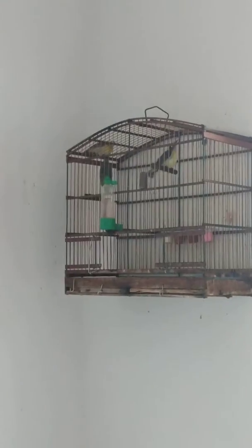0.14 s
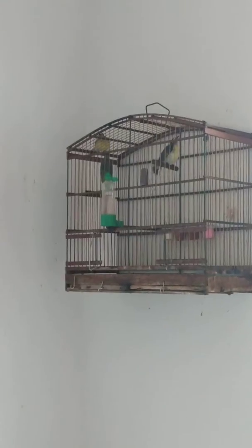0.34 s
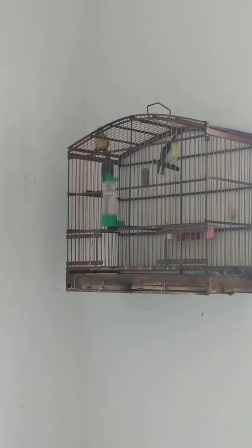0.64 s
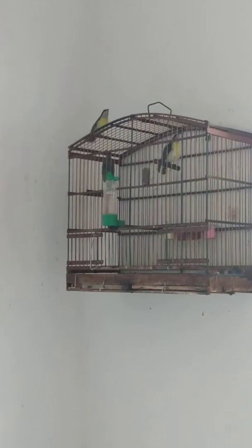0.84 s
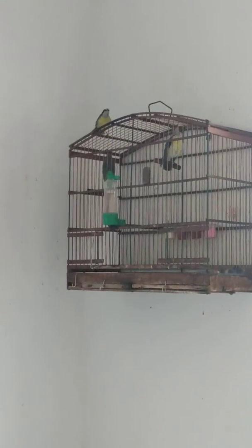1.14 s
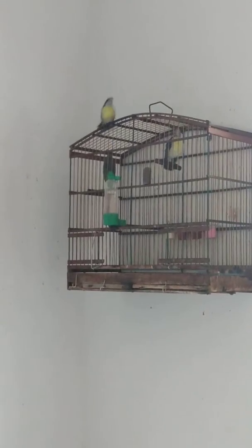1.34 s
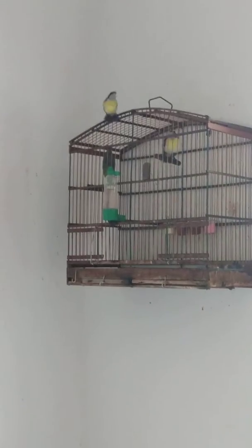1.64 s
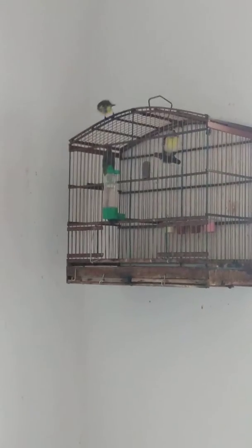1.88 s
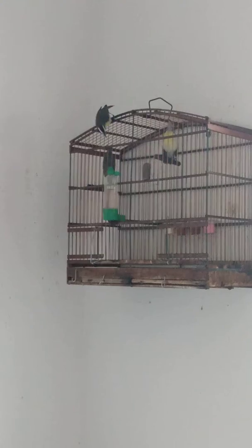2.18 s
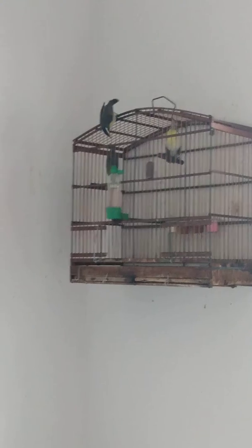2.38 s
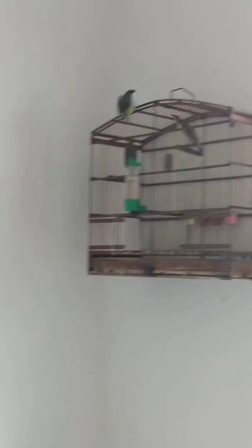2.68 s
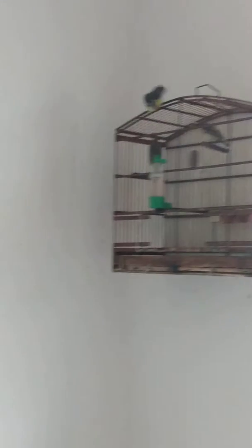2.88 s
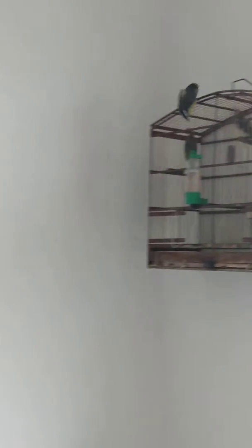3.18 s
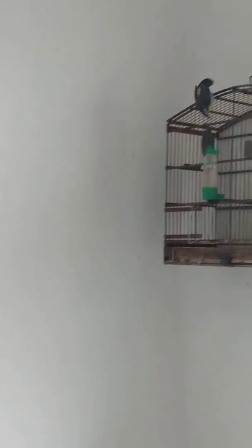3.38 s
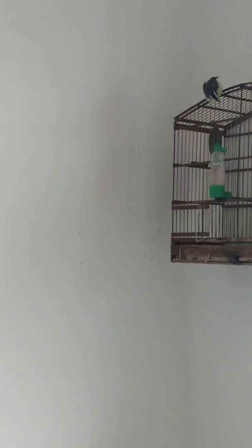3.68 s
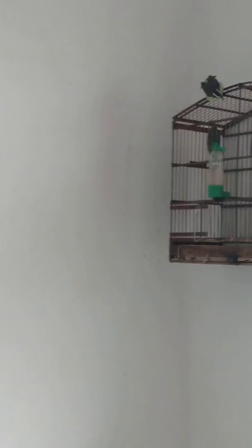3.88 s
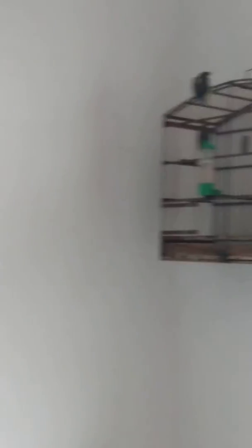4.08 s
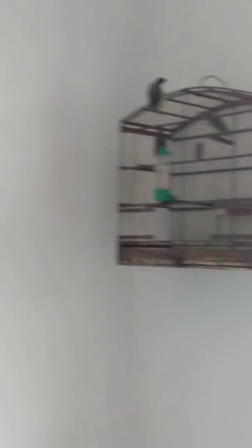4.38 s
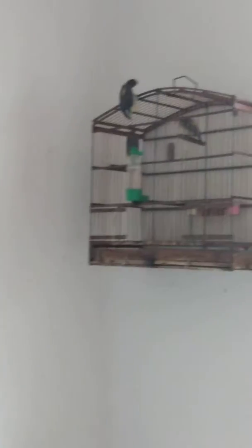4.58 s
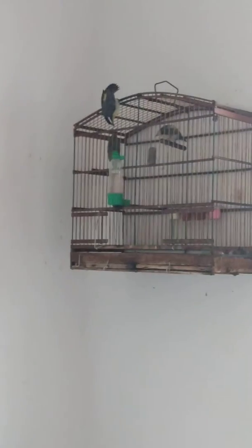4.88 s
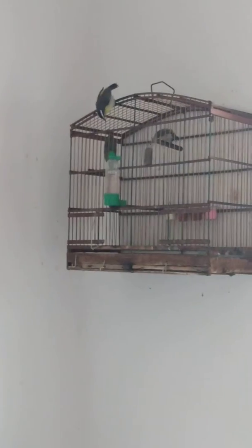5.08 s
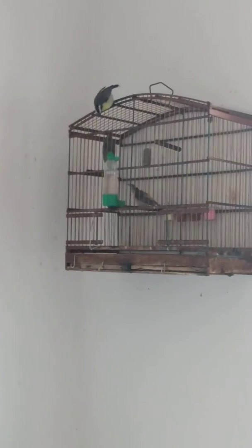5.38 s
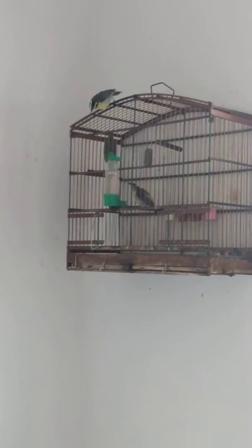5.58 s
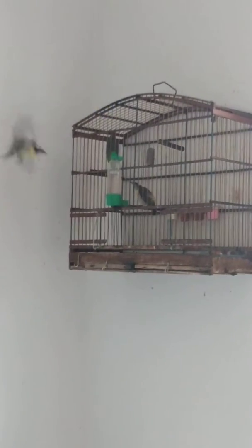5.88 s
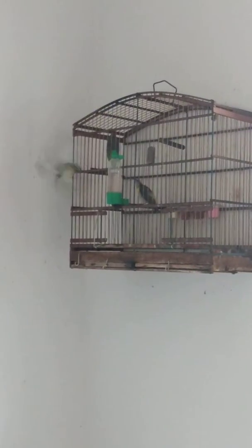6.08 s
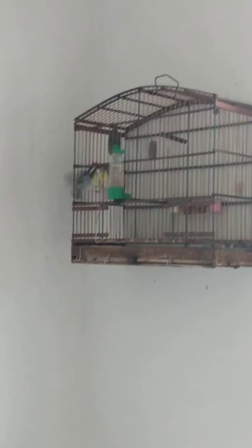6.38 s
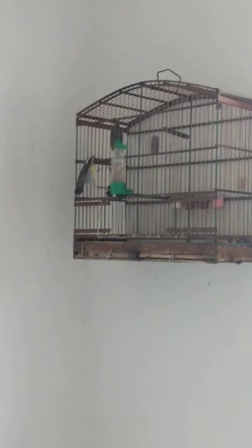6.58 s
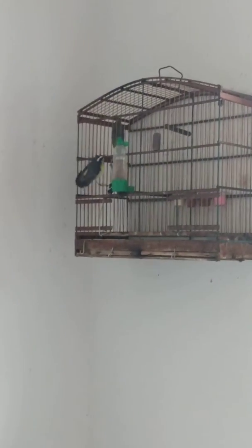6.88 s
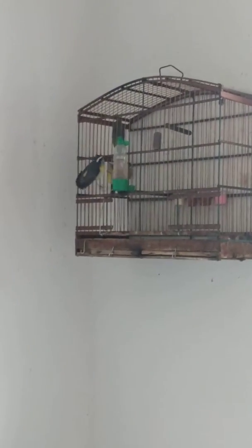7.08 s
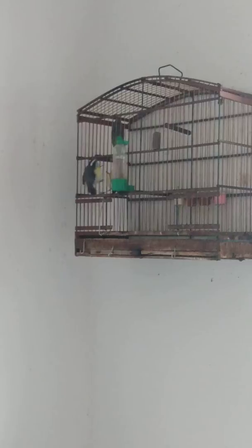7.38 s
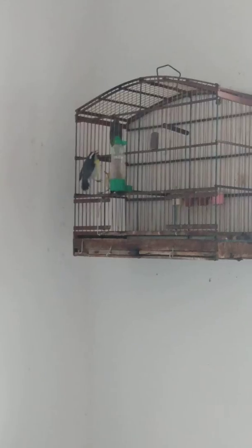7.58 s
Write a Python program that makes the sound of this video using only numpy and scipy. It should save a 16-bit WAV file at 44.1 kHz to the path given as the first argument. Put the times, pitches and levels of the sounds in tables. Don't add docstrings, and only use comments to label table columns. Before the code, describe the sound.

Two small caged songbirds in a bare, echoing room: one sings gliding whistles and raspy buzzes, the other gives sharp high chips, with claw ticks and wing flutters.

```python
import sys
import numpy as np
from scipy import signal
from scipy.fft import rfft, irfft
from scipy.io import wavfile
from scipy.ndimage import uniform_filter1d, minimum_filter1d

SR = 44100
rng = np.random.default_rng(int(sys.argv[2]) if len(sys.argv) > 2 else 0)


def invert_db(level):
    return 10 ** (np.asarray(level, dtype=float) / 20)


def transcribe(signal):
    frames = np.atleast_2d(signal).T
    limited = np.clip(frames, -1, 1)
    pcm = np.round(limited * 32767).astype(np.int16)
    wavfile.write(sys.argv[1], SR, pcm)


N = 341334
LEAD = SR // 4

# (time [s], left minus right [dB])
FACING = [(0.05, 1.5), (2.5, 0.5), (2.89, 1), (3.021, -4), (3.859, 4), (4.33, 1), (4.66, -0.5), (5.6, 0),
          (6.7, 3.5), (7.241, -1.5), (7.74, 2)]
# (start [s], length [s], low pitch [Hz], top pitch [Hz], peak level [dB])
WHISTLES = [
    (-.21, 0.285, 1904, 4824, -25),
    (2.958, 0.3, 1750, 4920, -27),
    (5.149, 0.13, 2410, 5057, -28),
    (5.383, 0.082, 2500, 5064, -31.5),
    (7.138, 0.3, 1900, 4835, -28),
]
WHISTLE_BEND, SWELL_DB, SWELL_BEND, SLOPE_DB = 2.2, -24.5, 3.47, -8.5
# (start [s], top pitch [Hz], level [dB], change towards the top [dB])
FLICKS = [
    (0.076, 9810, -30.5, 0),
    (5.281, 9740, -30.5, 1.5),
    (5.464, 9710, -31, 3),
]
FLICK_S, FLICK_HZ, FLICK_BEND, FLICK_SWING_HZ, FLICK_SOFT_DB = 0.036, 5000, 0.82, 350, -15.5
# (start [s], length [s], first pitch [Hz], last pitch [Hz], level [dB])
UNDERTONES = [
    (2.792, 0.15, 3130, 2166, -53),
    (6.956, 0.19, 3135, 2320, -52.5),
]
UNDERTONE_SWING_HZ, UNDERTONE_DIP_DB = 200, -8.5
# (time from start [s], pitch [Hz], effort [dB], buzz swing [Hz])
OPENING = [(0, 6470, -16, 200), (.012, 7970, -14.5, 150), (.028, 7880, 2, 292), (.038, 5000, -13, 394),
           (.05, 7700, -1.5, 1150), (.09, 7100, -1.5, 1800), (.14, 6250, -14.5, 2480),
           (.21, 5490, -18.5, 2710)]
CHURR = [(0, 8300, -8.5, 296), (.014, 7315, -1, 690), (.025, 4300, -7.5, 400), (.036, 6900, -5, 1200),
         (.075, 6317, -5.5, 1660), (.12, 5690, -7.5, 1540), (.155, 5274, -2, 874), (.23, 4750, -1.5, 850),
         (.295, 3800, -7.5, 505)]
RASP = [(0, 2918, -7.5, 913), (.075, 4470, 2, 868)]
CLIMB = [(0, 4700, -25.5, 67), (.055, 5427, -8.5, 190), (.11, 6004, -6, 680), (.16, 6567, -3, 910),
         (.21, 6986, -0.5, 250), (.25, 7480, -1, 80), (.3, 7805, 1, 4.9), (.35, 7930, -0.5, 7.6)]
STUTTER = [(0, 8000, -14, 60), (.018, 7790, 1, 100), (.028, 4273, -17, 290), (.04, 7300, -5.5, 1510),
           (.07, 7800, -16, 1800), (.11, 7340, -11, 1480)]
TSIP = [(0, 8000, -16, 8), (.015, 7995, -3.5, 24), (.034, 5400, -18, 240), (.042, 7790, -5, 1180),
        (.075, 7680, -16, 1800), (.11, 7220, -24, 2360)]
DRAWL = [(0, 7600, -11, 398), (.02, 7926, -1, 850), (.06, 7450, -7.5, 1240), (.1, 6910, -7.5, 1690),
         (.14, 6500, -17, 1700), (.18, 6284, -18, 1510), (.195, 6930, -4.5, 1200), (.23, 7180, -3.5, 710)]
PLUNGE = [(0, 7360, -2, 210), (.028, 5580, -0.5, 33), (.058, 4425, -3, 25), (.095, 3934, -10, 14),
          (.14, 3696, -8.5, 60), (.158, 3600, -14, 60), (.175, 2900, -11.5, 150), (.195, 2680, -39, 150)]
STAIR = [(0, 2400, -34, 180), (.04, 2964, -26.5, 73), (.066, 3400, -12.5, 40), (.078, 3604, -8.5, 47),
         (.13, 3927, -11.5, 210), (.175, 4260, -7.5, 10), (.24, 4649, -2.5, 12), (.305, 4814, -3.5, 6.1)]
HOOK = [(0, 5000, -7, 60.4), (.012, 6680, -4.5, 150), (.022, 7390, 1, 150), (.04, 7600, -6, 301)]
# (shape, start [s], level [dB], pace [factor], pitch [factor])
VERSES = [(OPENING, 2.416, -46, 1.01, 0.99), (CHURR, 2.6806, -38, 1.01, 0.95),
          (RASP, 3.345, -46, 1.01, 1.03), (RASP, 7.535, -48, 0.95, 0.98), (CLIMB, 3.39, -28.5, 1.01, 1.001),
          (STUTTER, 3.862, -32, 1.2, 1.008), (TSIP, 4.003, -22.5, 1.001, 1.007),
          (DRAWL, 4.162, -26, 0.93, 0.94), (PLUNGE, 4.393, -26, 1.02, 1.001),
          (TSIP, 4.62, -26.5, 0.89, 1.001), (STAIR, 4.745, -23.5, 1.001, 1.001),
          (OPENING, 6.624, -44, .85, 1), (CHURR, 6.843, -36.5, 0.98, 1.037),
          (HOOK, 7.449, -37, 1.001, 1.001), (CLIMB, 7.585, -29, 1.001, 1.001)]
RUSH_DB, RUSH_HZ_PER_S = 16.5, 82000
TURN_DIP_DB = -10
# (start [s], length [s], first pitch [Hz], last pitch [Hz], level [dB])
OVERPEEPS = [
    (2.432, .03, 9510, 9330, -48.5),
    (3.853, 0.038, 8970, 9400, -49),
    (4.617, .035, 9660, 9720, -38.5),
    (6.638, 0.028, 9500, 9450, -50),
]
# (start [s], upper voice [dB], its top pitch [Hz], lower voice [dB], its pitch [Hz])
CHIPS = [
    (0.446, -25, 11430, -23, 8150),
    (0.549, -30, 10820, -23.5, 7728),
    (1.443, -29.5, 11140, -27.5, 7723),
    (1.843, -25, 11340, -25.5, 8060),
    (3.205, -20.5, 11040, -24.5, 7820),
    (3.896, -38, 11600, -37, 8380),
    (5.011, -20.5, 10970, -25, 7710),
    (5.918, -24, 11030, -26, 7880),
    (6.334, -31, 10690, -25, 7785),
    (7.291, -23, 11050, -25, 7680),
]
CALLER_PAN_DB = 6.5
# (start [s], length [s], first pitch [Hz], last pitch [Hz], level [dB])
FAR_BIRDS = [
    (0.677, 0.07, 3920, 4090, -56.5),
    (0.559, 0.038, 2440, 2310, -62.5),
    (1.448, 0.038, 2460, 2310, -67.5),
    (1.65, 0.078, 6400, 4040, -67.5),
    (5.77, 0.08, 5500, 5050, -60),
    (6.188, 0.065, 5520, 4950, -62),
    (6.17, 0.14, 3700, 3340, -62),
    (6.42, 0.2, 2930, 2960, -61),
]
# (start [s], length [s], wires [dB], scrape [dB], wires nearest the grip [Hz])
HOPS = [(0.535, 0.039, -46.5, -81, 12500), (0.72, 0.027, -59, -80, 5400), (0.864, 0.077, -45.5, -82, 13350),
        (0.872, 0.044, -49.5, -80, 7000), (0.921, 0.032, -50, -76, 8640), (0.926, 0.057, -59, -88, 4160),
        (1.32, 0.059, -65, -99.5, 6100), (1.398, .04, -59, -99, 5100), (1.399, 0.054, -56, -99, 7900),
        (0.897, 0.042, -58, -90, 5740), (1.395, 0.046, -51.5, -82, 11600), (1.912, 0.15, -91.5, -64, 6060),
        (2.194, .03, -80, -99, 14000), (5.52, 0.11, -65, -61, 9000), (5.763, 0.041, -48.5, -55, 13700),
        (5.855, 0.44, -75, -64, 8950), (6.271, 0.42, -82, -63, 9000)]
# (pitch [Hz], width [Hz], level [dB])
WIRES = [(4120, 220, -8.5), (5090, 110, -5.5), (5855, 170, -0.5), (6740, 110, -6.5), (7620, 200, -3),
         (4520, 130, -15), (6980, 250, -4), (8900, 400, 2.5), (10400, 160, -7), (11600, 400, -6),
         (12500, 120, -3.5), (13900, 130, -7), (15100, 200, -5)]
# (frequency [Hz], density [dB per Hz])
SCRAPE = [(120, -40.5), (200, -14.5), (4040, -11), (4680, -12), (5730, -10.5), (6280, -15.5), (8900, -15),
          (10500, -11), (12400, -23), (16000, -29)]
# (start [s], length [s], level [dB], centre [Hz])
WINGS = [(0.86, 0.22, -54.5, 1020), (3.6, 0.1, -69.5, 1000), (4.503, 0.31, -73, 714),
         (5.134, 0.18, -70, 1500), (5.38, 0.11, -71, 1530), (7.662, 0.089, -66.5, 610),
         (5.529, 0.25, -50, 362), (5.782, 0.22, -58, 470), (5.927, 0.24, -48, 350), (6.057, 0.23, -49, 334),
         (6.236, 0.27, -49.5, 400), (6.535, 0.27, -68, 284)]
WING_RISE_S, WING_FADE_DB, WING_SINK = 0.017, -23.5, 0.85
# (start [s], length [s], pitch [Hz], level [dB])
KNOCKS = [
    (0, 0.076, 510, -74),
    (0.686, 0.085, 740, -78),
    (3.495, 0.12, 506, -60),
    (6.6, 0.15, 540, -71),
    (7.593, 0.11, 516, -60.5),
]
# (time [s], level [dB])
HUM = [(0.0, -76), (1.03, -78), (1.31, -89.5), (1.79, -85.5), (3.34, -77.5), (3.38, -83), (4.4, -75.5),
       (5.5, -87), (5.58, -69), (6.03, -75.5), (6.08, -61), (6.36, -57.5), (7.61, -78.5), (7.74, -90.5)]
# (pitch [Hz], width [Hz], level [dB])
DRONE = [(114.4, 19, -1), (129, 26, -3), (164, 15, -7)]
HUM_DB, DRONE_DB, DRONE_FOLLOWS = 6.5, -66.5, 0.55
# (time [s], level over the drone [dB])
THUMPS = [
    (.34, 4.5),
    (.99, 12),
    (3.62, 5),
    (5.6, 12.5),
    (6.08, 9),
    (7.09, 8.5),
    (7.73, 3),
]
THUMP_S = 0.054
# (frequency [Hz], density [dB per Hz])
FLOOR = [(12, -72), (20, -6.5), (104, -7.5), (262, -35), (472, -15), (642, -26), (1220, -22), (4540, -44),
         (13900, -31.5), (16000, -44)]
FLOOR_DB = -85.5
# (frequency [Hz], time to fall 60 dB [s])
ROOM = [(300, 0.067), (2000, 0.6), (3500, 0.59), (5000, 0.57), (8000, 0.51), (12000, 0.39), (16000, 0.38)]
ECHO_S, ECHO_DB = 0.0145, -6.5
EARLY_GAIN, EARLY_S = 0.59, 0.028
GATE_DB = -108
# (frequency [Hz], gain [dB])
MIC = [(1000, -4), (2500, 8), (5000, 9.5), (8000, 8.5), (10000, 3.5), (12000, 8.5), (14500, 7.5),
       (16000, 9.5)]
EDGE_HZ = 15850
CEILING = 0.74
UNDER_DB, UNDER_SLOPE_DB, CHANCE_DB, LOW_HZ = 49, 0.9, 7.5, 900
NEIGHBOUR_DB = 38
SPARSE_DB, SPARSE_HZ, SPARSE_WIDTH_HZ = 2.5, 3900, 1700


def evened(x):
    return x / np.sqrt(np.mean(x ** 2) + 1e-20)


def read(points, hz):
    f, value = np.transpose(points)
    return np.interp(np.log(hz + 1), np.log(f + 1), value)


def add(mix, s, sound):
    part = mix[..., round(s * SR):][..., :sound.shape[-1]]
    part += sound[..., :part.shape[-1]]


def coloured(x, points):
    n = x.shape[-1]
    return irfft(rfft(x) * invert_db(read(points, np.fft.rfftfreq(n, 1 / SR))), n)


def resonate(x, hz, width):
    turn = np.exp(2j * np.pi * np.cumsum(hz * np.ones(x.shape[-1])) / SR)
    r = np.exp(-np.pi * width / SR)
    return 2 * (turn * signal.lfilter([1 - r], [1, -r], x / turn)).real


def resonate_twice(x, hz, width, second_width):
    return resonate(resonate(x, hz, width), hz, second_width)


def sides(pan_db):
    return invert_db(np.array([pan_db, -pan_db]) / 2)


def partial(hz, order=1):
    wave = np.sin(2 * np.pi * order * np.cumsum(hz) / SR)
    return np.sqrt(2) * wave * (order * hz < SR / 2 - 1000)


def singer():
    voice = np.zeros(N + LEAD)
    for rule, table in (whistle, WHISTLES), (flick, FLICKS), (undertone, UNDERTONES), (syllable, VERSES):
        for row in table:
            rows = rule(*row)
            add(voice, rows[0][0] + LEAD / SR, note(rows))
    return voice * sides(np.interp(np.arange(-LEAD, N) / SR, *np.transpose(FACING)))


def whistle(start, length, low_hz, top_hz, db):
    left = np.linspace(1, 0, num=12)
    hz = top_hz - (top_hz - low_hz) * left ** (WHISTLE_BEND - 1.9 * length)
    level_db = db + SWELL_DB * left ** SWELL_BEND + SLOPE_DB * left
    return np.transpose([start + length * (1 - left), hz, level_db, 0 * left])


def flick(start, top_hz, db, change_db):
    u = np.linspace(0, 1, num=9)
    hz = FLICK_HZ + (top_hz - FLICK_HZ) * u ** FLICK_BEND
    level_db = db + FLICK_SOFT_DB * np.clip(1 - u / 0.52, 0, 1) + change_db * np.clip(u - 0.4, 0, 1) / 0.6
    return np.transpose([start + FLICK_S * u, hz, level_db, FLICK_SWING_HZ * u])


def undertone(start, length, first_hz, last_hz, db):
    u = np.linspace(0, 1, num=3)
    hz = first_hz + (last_hz - first_hz) * u
    level_db = db + UNDERTONE_DIP_DB * np.sin(np.pi * u)
    return np.transpose([start + length * u, hz, level_db, UNDERTONE_SWING_HZ + 0 * u])


def syllable(shape, start, db, pace, pitch):
    return np.array(shape) * [pace, pitch, 1, 1] + [start, 0, db, 0]


def note(rows):
    s, *columns = np.transpose(rows)
    t = np.arange(s[0], s[-1], 1 / SR)
    hz, level_db, swing_hz = (uniform_filter1d(np.interp(t, s, c), 200, mode="nearest") for c in columns)
    wander = evened(uniform_filter1d(rng.standard_normal(len(t)), 150))
    shake = np.sin(2 * np.pi * np.cumsum(330 * (1 + 0.25 * wander)) / SR)
    low_hz, rasp_fall_db = 1500 + 0.15 * hz, 5.74 * hz / 1000
    rush_db = RUSH_DB * np.clip(abs(np.gradient(hz)) * SR / RUSH_HZ_PER_S, 0, 1)
    hz = hz * (1 + 0.0015 * wander) + swing_hz * shake
    harsh_db = 11.14 * swing_hz / 1000
    edge_db = 0.19 * (level_db - level_db.max())

    second_db = -41.0 + 3.5 * hz / 1000 + 0.51 * harsh_db + edge_db
    third_db = -23.5 + 0.33 * harsh_db + 2.2 * edge_db
    tone = partial(hz) + invert_db(second_db) * partial(hz, order=2) + invert_db(third_db) * partial(hz, order=3)
    tone = tone * invert_db(TURN_DIP_DB * (shake ** 2 - 0.3453) * np.clip(swing_hz / 600, 0, 1))

    air = rng.standard_normal((2, len(t)))
    halo = evened(resonate(resonate_twice(air[0], hz, 1800, 1800), hz, 1800))
    throat = resonate(resonate(air[0], 1390, 900), 1500, 1200)
    hiss = np.diff(air[1], prepend=0) + 0.64 * throat
    breath = invert_db(-24 + 1.2 * harsh_db) * halo + invert_db(-29.5 + 0.32 * edge_db + rush_db) * hiss
    rasp_db = -13.5 + 1.51 * harsh_db - rasp_fall_db
    rasp = invert_db(rasp_db) * evened(resonate_twice(air[1], low_hz, 710, 800))
    return invert_db(level_db) * (tone + breath + rasp) * signal.windows.tukey(len(t), min(1, 700 / len(t)))


def caller():
    out = np.zeros((2, N))
    for s, *shape in CHIPS:
        add(out, s, chip(*shape, CALLER_PAN_DB))
    return out


def chip(upper_db, top_hz, lower_db, lower_hz, pan_db):
    t = np.arange(0, 0.045, 1 / SR)
    left_s = t[-1] - t
    climb = np.clip(t / 0.022, 0, 1)
    upper_hz = 5800 + (top_hz - 5800) * climb ** 0.6
    bend = 1 - 0.035 * np.exp(-t / 0.01417) + 0.03623 * np.sin(np.pi * t / t[-1])
    tremble = 1 + 0.022 * invert_db(upper_db - lower_db) * np.sin(2 * np.pi * 400 * t)
    held_hz = lower_hz * bend * tremble

    upper = invert_db(upper_db) * np.clip(t / 0.011, 0, 1) ** 0.7 * np.clip(2.17 * (1 - climb), 0, 1) ** 0.52
    upper = upper * (1 + 0.94 * np.sin(2 * np.pi * 330 * t))
    onset = 0.11 * np.clip(t / 0.0068, 0, 1) + 0.57 * np.clip(t / 0.0058, 0, 1) ** 2.1
    lower = invert_db(lower_db) * onset * np.clip(left_s / 0.0045, 0, 1)
    tone = upper * (partial(upper_hz) + invert_db(-6.5) * partial(upper_hz, order=2))
    tone = tone + lower * (partial(held_hz) + invert_db(-29.5) * partial(held_hz, order=2))
    shelf = invert_db(1.6 * lower_db - 0.6 * upper_db - 21.0)
    shelf = shelf * np.clip((t - 0.02) / 0.004, 0, 1) * np.clip(left_s / 0.008, 0, 1)
    tone = tone + shelf * partial(0.966 * upper_hz)

    difference = invert_db(-38.5) * partial(upper_hz - held_hz)
    total = invert_db(-19.0) * partial(upper_hz + held_hz)
    mixed = np.sqrt(upper * lower) * (difference + total)
    air = rng.standard_normal(len(t))
    snap = invert_db(lower_db - 20.0) * np.exp(-t / 0.22) * evened(resonate_twice(air, 14200, 3030, 3030))
    husk = invert_db(lower_db - 36.0) * np.hanning(len(t)) * evened(resonate_twice(air, 5700, 900, 1200))
    return sides(pan_db)[:, None] * (tone + mixed + snap + husk)


def peeps(table):
    out = np.zeros((2, N))
    for s, length, first_hz, last_hz, db in table:
        hz = np.linspace(first_hz, last_hz, round(length * SR))
        peep = evened(resonate_twice(rng.standard_normal((2, len(hz))), hz, 90, 130))
        add(out, s, invert_db(db) * peep * np.hanning(len(hz)))
    return out


def cage():
    force_db = 6.45 * np.minimum(rng.exponential(1, N), 5)
    happens = rng.random(N) < 1500 / SR
    ticks = evened(rng.standard_normal(N) * invert_db(force_db) * happens)
    ring, scrape = np.zeros((len(WIRES), N)), np.zeros(N)
    wire_hz = np.array(WIRES)[:, :1]
    for s, length, wires_db, scrape_db, near_hz in HOPS:
        grip = signal.windows.tukey(round(length * SR), 0.3)
        add(ring, s, invert_db(wires_db - 150 * np.log2(wire_hz / near_hz) ** 2) * grip)
        add(scrape, s, invert_db(scrape_db) * grip)
    out = scrape * evened(coloured(ticks, SCRAPE))
    for force, (hz, width, db) in zip(ring * ticks, WIRES):
        ringing = resonate_twice(force, hz, 1.05 * width, 0.73 * width)
        out = out + invert_db(db) * np.sqrt(SR / width) / 3 * ringing
    return out


def wings():
    out = np.zeros((2, N))
    for s, length, db, centre_hz in WINGS:
        t = np.arange(0, length, 1 / SR)
        air = rng.standard_normal(len(t)) + 1.13 * rng.standard_normal((2, len(t)))
        hz = centre_hz * (1 - WING_SINK * (t / length) ** 2)
        beats = 1 + 0.16 * np.sin(2 * np.pi * 22 * t)
        air = evened(resonate_twice(air, hz, 1220, 770)) * beats
        shape = np.clip(t / WING_RISE_S, 0, 1) ** 2 * invert_db(db + WING_FADE_DB * (t / length) ** 3.2)
        add(out, s, shape * air * signal.windows.tukey(len(t), 0.05))
    return out


def knocks():
    out = np.zeros((2, N))
    for s, length, hz, db in KNOCKS:
        air = rng.standard_normal((3, round(length * SR)))
        knock = evened(resonate_twice(air[0] + 0.598 * air[1:], hz, 110, 160))
        add(out, s, invert_db(db) * knock * np.hanning(air.shape[1]))
    return out


def hum():
    t = np.arange(N) / SR
    low_db = np.interp(t, *np.transpose(HUM)) + HUM_DB
    upper_db = DRONE_DB + DRONE_FOLLOWS * (low_db - low_db.mean())
    upper_db = upper_db + sum(db * np.exp(-((t - s) / THUMP_S) ** 2) for s, db in THUMPS)
    air = rng.standard_normal(N) + 0.4 * rng.standard_normal((2, N))
    low = 0.41 * evened(resonate(resonate(air, 68, 14), 61, 20)) + 0.78 * partial(np.full(N, 68.0))
    upper = evened(sum(invert_db(db) * resonate_twice(air, hz, width, 2 * width) for hz, width, db in DRONE))
    lines = (invert_db(low_db) * low + invert_db(upper_db) * upper) * sides(2.0)[:, None]
    above = [(hz, db - 40 * (hz < 200)) for hz, db in FLOOR]
    return lines + invert_db(FLOOR_DB) * evened(coloured(rng.standard_normal((2, N)), above))


def room(x, direct_db=-6.5):
    n = x.shape[1]
    turn = np.pi * np.arange(n) / SR * 0.7
    out = invert_db(direct_db) * x
    out = out + invert_db(ECHO_DB) * np.roll(out, round(ECHO_S * SR), axis=1)
    out[1] = np.roll(out[1], 6)
    for k in range(3):
        taps = np.zeros((2, SR))
        at = np.arange(120, SR - 10, 10) + rng.integers(0, 10, (2, (SR - 121) // 10))
        np.put_along_axis(taps, at, rng.choice([-1., 1.], at.shape), 1)
        hz, t, z = signal.stft(taps, SR, nperseg=128)
        z = z * invert_db(-60 * t / read(ROOM, hz)[:, None]) * np.clip(t / 0.011, 0.2, 1)
        z = z * (1 + EARLY_GAIN * np.exp(-t / EARLY_S))
        z = z * np.exp(-(t / 0.5) ** 3)
        tail = signal.istft(z, SR, nperseg=128)[1]
        share = np.sqrt(2 / 3) * np.cos(turn + k * np.pi / 3)
        out = out + signal.fftconvolve(x * share, tail / np.linalg.norm(tail[0]), axes=1)[:, :n]
    return out


def gated(x):
    z = signal.stft(x, SR, nperseg=512)[2]
    power = uniform_filter1d(abs(z) ** 2, size=5, axis=2)
    z = z * (power / (power + invert_db(2 * GATE_DB))) ** 2
    return signal.istft(z, SR, nperseg=512)[1][:, :N]


def limited(x):
    peak = -minimum_filter1d(-abs(x).max(0), size=1200)
    return x * uniform_filter1d(np.minimum(1, CEILING / (peak + 1e-9)), size=600)


def thinned(x):
    hz, t, z = signal.stft(x, SR, nperseg=1024)
    bands = abs(z[:, :512].reshape(2, 128, 4, -1)) ** 2
    band_hz = hz[2:512:4, None]
    level_db = 10 * np.log10(uniform_filter1d(bands.mean(2), size=4, axis=2) + 1e-14)
    luck = uniform_filter1d(rng.standard_normal((2, 64, len(t))), size=5, axis=2)
    luck = evened(luck.repeat(2, axis=1))
    over_loudest_db = level_db - level_db.max(1, keepdims=True) + UNDER_DB
    over_neighbour_db = level_db + minimum_filter1d(-level_db, size=21, axis=1) + NEIGHBOUR_DB
    margin_db = np.minimum(over_loudest_db, over_neighbour_db) + CHANCE_DB * luck
    margin_db = margin_db - UNDER_SLOPE_DB * band_hz / 1000
    margin_db = margin_db - SPARSE_DB * np.exp(-((band_hz - SPARSE_HZ) / SPARSE_WIDTH_HZ) ** 2)
    keep = np.repeat(np.clip(margin_db * 2 + 0.5, 0.01, 1), 4, axis=1)
    keep = np.where(hz[:512, None] > LOW_HZ, keep, 1)
    keep = np.pad(keep, ((0, 0), (0, 1), (0, 0)))
    return signal.istft(z * keep, SR, nperseg=1024)[1][:, :N]


def scene():
    after_lead = caller() + peeps(FAR_BIRDS) + peeps(OVERPEEPS) + cage()
    near = singer() + np.pad(after_lead, ((0, 0), (LEAD, 0)))
    return gated(room(near)[:, LEAD:]) + wings() + knocks() + hum()


def low_pass(x):
    return signal.sosfilt(signal.butter(12, 16640, fs=SR, output="sos"), x)


def record(dry):
    edge = signal.firwin(401, EDGE_HZ, window=("kaiser", 7), fs=SR)[None]
    dry = dry * np.clip(np.arange(N) / 80, 0, 1)
    heard = signal.oaconvolve(coloured(dry, MIC), edge, "same")
    mix = thinned(limited(heard))
    return low_pass(mix)


dry = scene()
out = record(dry)
transcribe(out)
```